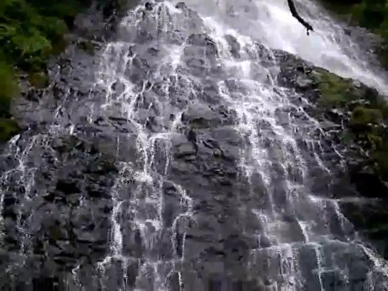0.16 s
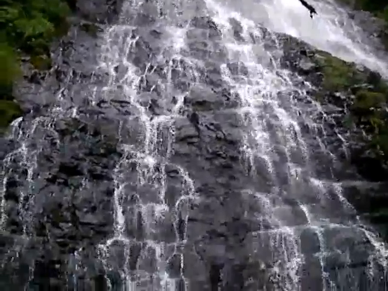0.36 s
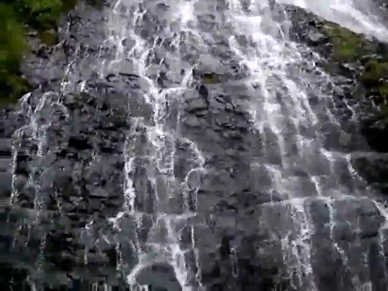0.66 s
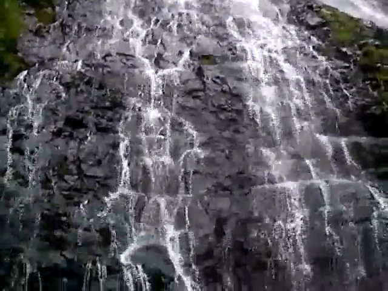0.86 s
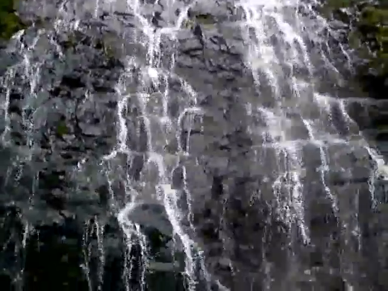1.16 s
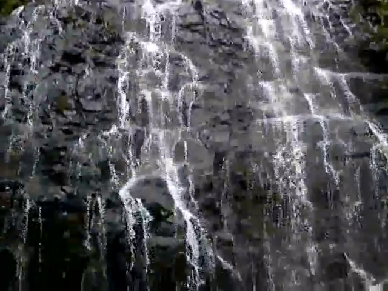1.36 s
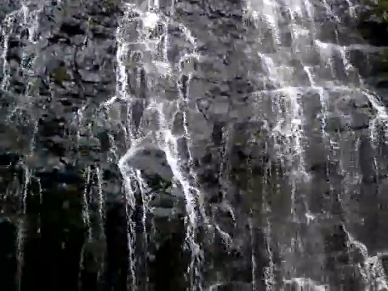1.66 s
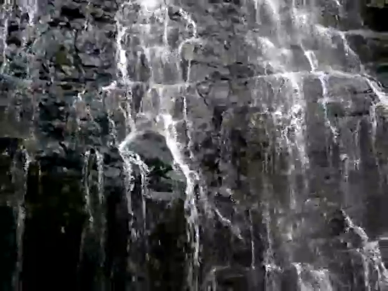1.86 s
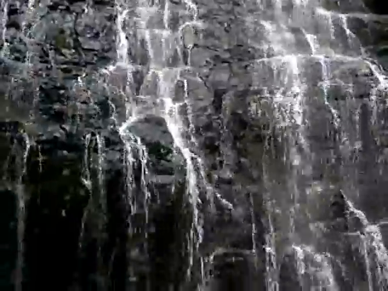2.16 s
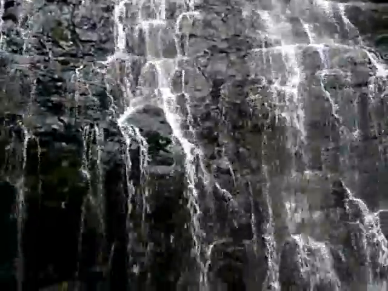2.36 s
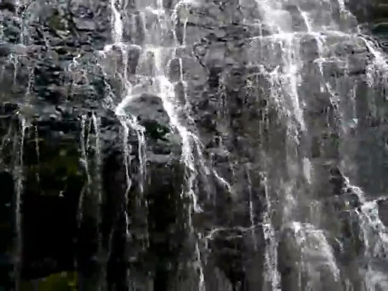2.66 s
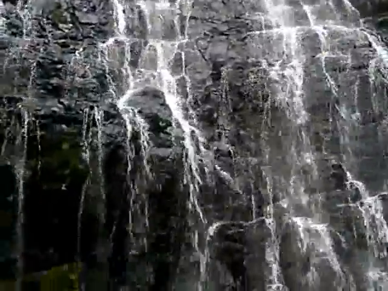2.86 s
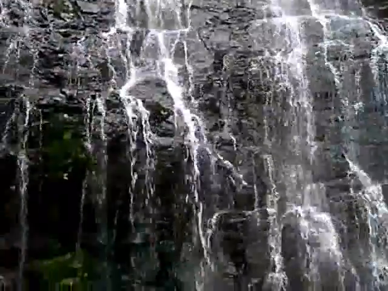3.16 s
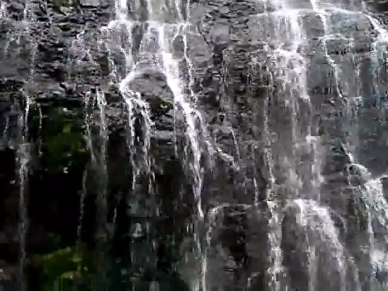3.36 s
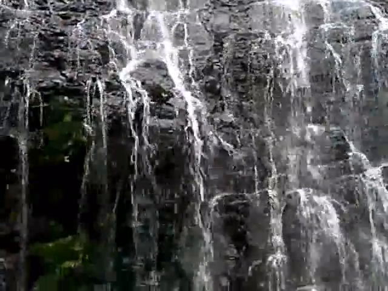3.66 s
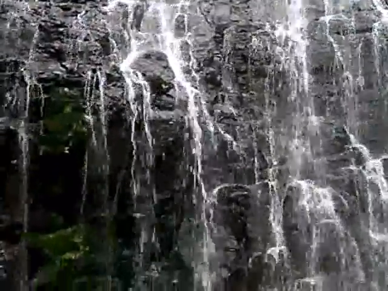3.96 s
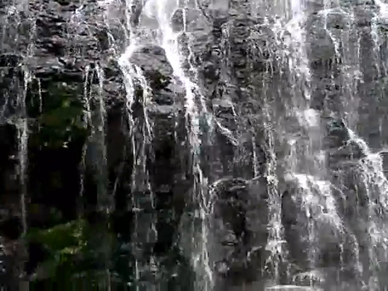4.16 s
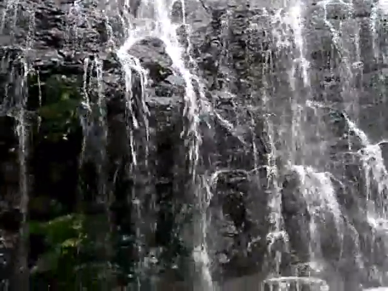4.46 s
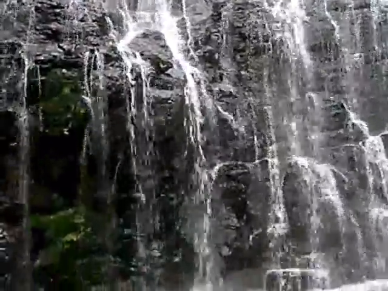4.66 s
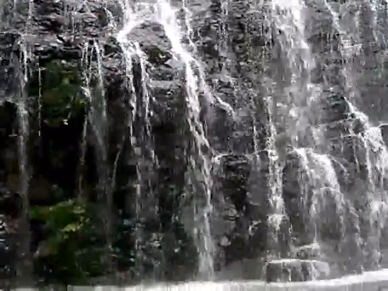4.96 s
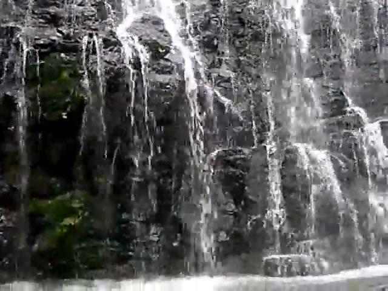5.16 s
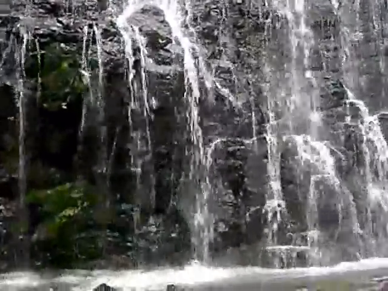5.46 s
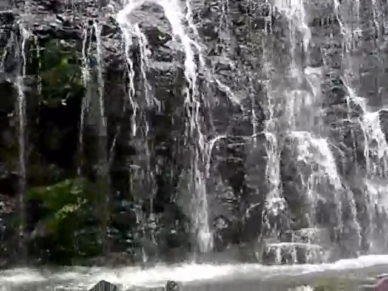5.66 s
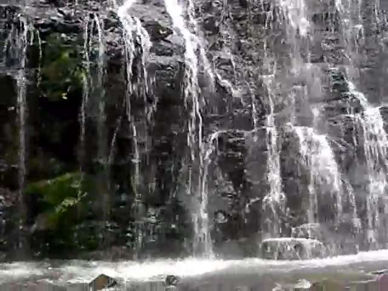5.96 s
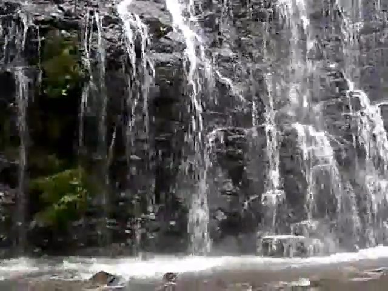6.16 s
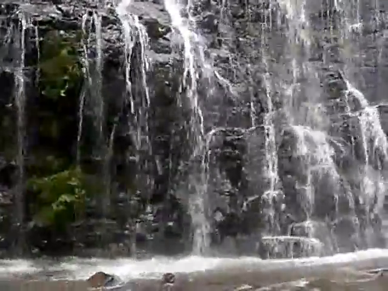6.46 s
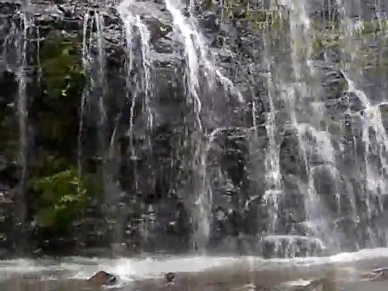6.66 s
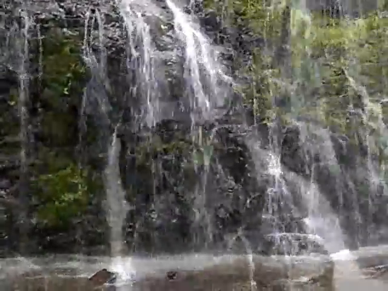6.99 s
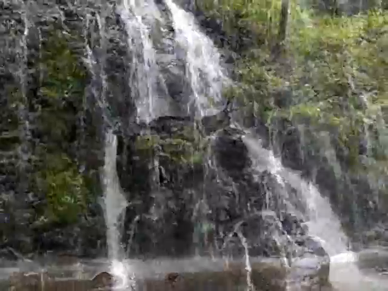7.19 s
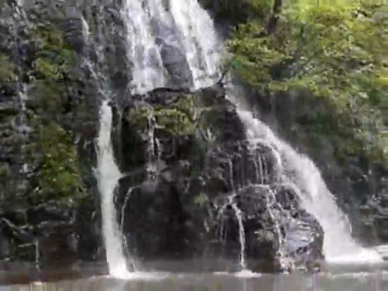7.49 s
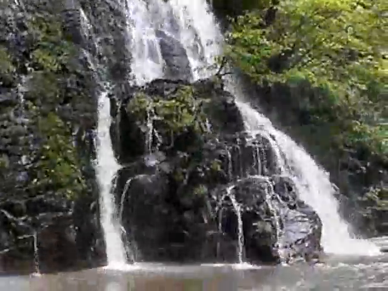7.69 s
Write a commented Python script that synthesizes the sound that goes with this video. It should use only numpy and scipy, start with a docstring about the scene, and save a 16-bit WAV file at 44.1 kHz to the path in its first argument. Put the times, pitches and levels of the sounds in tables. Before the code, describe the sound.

A close waterfall pours down rock into a pool in one steady, bright, gurgling rush with hissing spray.

```python
"""Close waterfall in a forest

Water pours down a steep rock face in one unbroken, bright, gurgling rush that eases near the end.
Heavy strands churn the pool and drag air under, which rings as bubbles. Spray hisses on the ledges,
and drops land as tiny slaps. The bass is thin: short low blips over a faint rumble.
Almost all of the sound is on the left."""
import sys
import numpy as np
from scipy import signal
from scipy.fft import rfft, irfft, next_fast_len
from scipy.io import wavfile
from scipy.ndimage import uniform_filter1d, minimum_filter1d, map_coordinates

SR = 44100
rng = np.random.default_rng(int(sys.argv[2]) if len(sys.argv) > 2 else 0)


def wrap_up_sound(samples):
    """Save the sound to the file named by the first command line argument, as 16-bit audio."""
    columns = np.atleast_2d(samples).T
    # keep every value between -1 and 1, then stretch to whole-number steps
    tamed = np.clip(columns, -1, 1)
    steps = np.round(tamed * 32767).astype(np.int16)
    wavfile.write(sys.argv[1], SR, steps)


N = 345303

# How the loudness of the falling water changes: time_s, level_db
FLOW_LEVELS = [(0.0, -17.5), (0.11, -21.5), (0.17, -18), (1.0, -19.5), (6.21, -19.5), (7.28, -23.5),
               (7.83, -21.5)]
# Tone of the strands plunging into the pool: frequency_hz, level_db
PLUNGE_TONE = [(200, -6.5), (380, -0.5), (500, -2.5), (620, -0.5), (1000, -0.36), (1500, -2.5),
               (2100, -1.54), (2700, -1), (3600, -1), (5000, -3), (7000, -12), (11000, -18)]
# An even tone that leaves the bubbles as they are: frequency_hz, level_db
FLAT_TONE = [(300, 0), (3000, 0)]
# Tone of the spray bursting on the ledges: frequency_hz, level_db
SPRAY_TONE = [(300, -27), (1500, -12.5), (3000, -17), (4200, -9.5), (5200, -6.5), (6050, -2.5), (6800, -5),
              (7400, -6.5), (8600, -1), (9400, -0.5), (10300, -2), (11000, -3.5)]
# Tone of the faint rumble: frequency_hz, level_db
RUMBLE_TONE = [(20, 1), (45, -7), (90, -22), (200, -1), (600, -41.5)]
# How alike the left and right sides are: frequency_hz, likeness_0_to_1
SIDE_LIKENESS = [(300, 1), (1000, 0.2), (2500, 0.35), (6000, 0), (10000, 0.3)]
# Strength of the low part of the rush against the rest: time_s, gain_db
BODY_LEVELS = [(1.4, 1), (2.1, 0), (5.1, -1.9), (5.8, 2.5), (7.8, -1)]
# Short, soft, low blips under the rush: middle_s, peak_db, pitch_hz
LOW_BLIPS = [(0.565, -28.5, 173), (0.606, -26.5, 170), (0.762, -34, 209), (0.906, -31, 172),
             (1.181, -30, 173), (1.23, -29, 172), (2.016, -33, 210), (2.107, -23.5, 133), (2.188, -30, 212),
             (2.708, -32, 172), (3.008, -31, 173), (3.066, -25, 155), (3.663, -30, 213), (4.08, -32, 171),
             (4.146, -32, 134), (4.446, -33, 171), (4.784, -32, 172), (5.401, -34, 209), (5.437, -35, 207),
             (5.857, -29, 211), (6.286, -31, 173), (6.482, -30, 135), (6.849, -32, 173), (7.097, -37, 174),
             (7.175, -36, 211), (7.318, -40, 208), (7.356, -39.5, 206)]

TOP_HZ = 11110  # the treble ends here
BLIP_S, HARD_BLIP_DB = 0.036, -22.5  # length of a soft blip; the level at which a blip is half as long


def amp(db):
    """Turn decibels into a number to multiply by."""
    return 10 ** (np.asarray(db) / 20)


def unit(x):
    """Scale a signal to an average (rms) level of 1."""
    return x / np.sqrt(np.mean(x ** 2) + 1e-20)


def along(points, hz):
    """Read between the rows of a frequency table, on a log scale like musical pitch."""
    row_hz, values = np.transpose(points)
    return np.interp(np.log(hz + 1), np.log(row_hz + 1), values)


def wobble(rate):
    """A smooth curve through `rate` random values a second."""
    return map_coordinates(rng.standard_normal(int(N * rate / SR) + 4), [np.arange(N) * rate / SR])


def filtered(x, response):
    """Turn each frequency up or down by the gain response(hz)."""
    size = next_fast_len(N + SR // 2)
    return irfft(rfft(x, size) * response(np.fft.rfftfreq(size, 1 / SR)), size)[..., :N]


def stereo(pair, tone):
    """Give two unrelated signals a tone, then blend some of the left one into the right."""
    left, other = filtered(pair, lambda hz: amp(along(tone, hz)))
    alike = lambda hz: np.clip(along(SIDE_LIKENESS, hz), 0, 1)
    right = filtered(left, alike) + filtered(other, lambda hz: np.sqrt(1 - alike(hz) ** 2))
    return unit(np.array([left, right]))


def patchy_noise(patchy_db):
    """Two noises whose frequency bands swell and fade on their own, as clumps of water land."""
    bands = signal.stft(rng.standard_normal((2, N)), nperseg=512)[2]
    patches = uniform_filter1d(rng.standard_normal(bands.shape[1:]), size=5, axis=0)  # smooth over pitch
    patches = uniform_filter1d(patches, size=11, axis=1)  # and over time
    return signal.istft(bands * amp(patchy_db * unit(patches)), nperseg=512)[1][:, :N]


def pings(count, pitch_hz, octaves, cycles, scatter_db, rise, samples):
    """Tiny fading tones at random times, pitches and strengths; `rise` bends their pitch upward."""
    when, chance = rng.random((count, 2)).T[..., None]
    hz = np.clip(pitch_hz * 2 ** (octaves * rng.standard_normal((count, 1))), SR / samples, TOP_HZ)
    turns = hz * np.arange(samples) / SR
    age = turns / cycles
    ring = np.sin(2 * np.pi * turns * (1 + rise * np.minimum(age, 1))) * np.exp(-np.pi * age)
    ring *= amp(-scatter_db * np.log(np.maximum(chance, 0.005)))  # a few stand out
    where = (when * N).astype(int) + np.arange(samples)
    return np.bincount(where.ravel(), ring.ravel(), N + samples)[:N]


def pool():
    """Heavy strands churn the pool; the air they drag under rings as countless bubbles."""
    churn = stereo(patchy_noise(patchy_db=0.47), PLUNGE_TONE)
    bubbles = [pings(count=3500, pitch_hz=1105.5, octaves=0.9, cycles=25,
                     scatter_db=1, rise=0.045, samples=1200) for _ in range(2)]
    return amp(-8) * churn + amp(-21) * stereo(bubbles, FLAT_TONE)


def ledges():
    """Fine spray hisses on the rock; nearer drops land as separate tiny slaps."""
    hiss = stereo(patchy_noise(patchy_db=0.6), SPRAY_TONE) * amp(0.065 * wobble(21))
    drops = [pings(count=20000, pitch_hz=6400, octaves=0.57, cycles=1.55,
                   scatter_db=1.5, rise=0, samples=96) for _ in range(2)]
    return amp(0.5) * hiss + amp(-8.5) * stereo(drops, SPRAY_TONE)


def waver_body(water, body_hz=450, sway_db=0.5, dip_db=3):
    """The low part of the rush sways gently in level and dips briefly at random moments."""
    body = filtered(water, lambda hz: 1 / (1 + (hz / body_hz) ** 8))
    body_db = np.interp(np.arange(N) / SR, *np.transpose(BODY_LEVELS))
    body_db += sway_db * wobble(3.95)
    body_db -= dip_db * np.maximum(wobble(18), 0) ** 2
    return water - body + body * amp(body_db)


def gurgle(water, faint_db, samples=1280):
    """Faint patches of pitch and time drop away, leaving hollows; weaker bands gurgle more."""
    overlap = samples - samples // 4
    bands = signal.stft(water, nperseg=samples, noverlap=overlap)[2]
    slice_db = np.interp(np.linspace(0, N, bands.shape[-1]), np.arange(N), faint_db)
    faint = np.sqrt(np.mean(np.abs(bands) ** 2)) * amp(slice_db)
    keep = 1 / (1 + (faint / (np.abs(bands) + 1e-9)) ** 8)
    return signal.istft(bands * keep, nperseg=samples, noverlap=overlap)[1][:, :N]


def rumble():
    """A very faint, deep noise wavers under the rush."""
    noise = stereo(rng.standard_normal((2, N)), RUMBLE_TONE)
    return amp(-75 + 4.6 * wobble(7.3)) * noise


def burbles(count, pitch_hz=291, octaves=0.1, against_flow_db=-11):
    """List higher blips at random times, louder in fuller flow: middle_s, peak_db, pitch_hz."""
    when, pitch = rng.random((count, 2)).T
    middle_s = BLIP_S + when * (N / SR - 2 * BLIP_S)
    peak_db = np.interp(middle_s, *np.transpose(FLOW_LEVELS)) + against_flow_db
    return list(zip(middle_s, peak_db, pitch_hz * 2 ** (octaves * (2 * pitch - 1))))


def blips():
    """Each blip swells and fades within a few slow vibrations; louder ones are shorter, more like a thud."""
    out = np.zeros(N)
    for middle_s, peak_db, pitch_hz in [*LOW_BLIPS, *burbles(count=30)]:
        length_s = BLIP_S / (1 + amp(peak_db - HARD_BLIP_DB) ** 2)
        t = np.arange(-length_s / 2, length_s / 2, 1 / SR)
        swell = np.cos(np.pi * t / length_s) ** 2
        tone = np.sin(2 * np.pi * (pitch_hz * t + rng.random()))
        start = round((middle_s - length_s / 2) * SR)
        out[start:start + len(t)] += amp(peak_db) * swell * tone
    return out


def scene():
    """Pool and ledges swell together and gurgle more in fuller flow, over the rumble and blips."""
    flow_db = np.interp(np.arange(N) / SR, *np.transpose(FLOW_LEVELS))
    bass_cut_hz = 290
    water = filtered(pool() + ledges(), lambda hz: 1 / np.sqrt(1 + (bass_cut_hz / (hz + 1)) ** 12))
    water = waver_body(water)
    faint_db = -4 + 0.14 * (flow_db - np.median(flow_db))
    rush = amp(flow_db + 8.5) * gurgle(water, faint_db)
    return rush + rumble() + blips()


def record(dry):
    """Cut a narrow gap in the treble, hold down peaks, turn the right side far down, trim the top."""
    gap_hz, half_width_hz = 7860, 185
    heard = filtered(dry, lambda hz: 1 / (1 + (half_width_hz / (np.abs(hz - gap_hz) + 1)) ** 3))
    safe_gain = np.minimum(1, 0.93 / (np.abs(heard[0]) + 1e-9))
    smooth_gain = uniform_filter1d(minimum_filter1d(safe_gain, size=129), size=129)
    heard = heard * smooth_gain * amp([[0], [-29.4]])  # left, right
    return filtered(heard, lambda hz: np.clip((TOP_HZ - hz) / 200 + 0.5, 0, 1))


dry = scene()
out = record(dry)
wrap_up_sound(out)
```